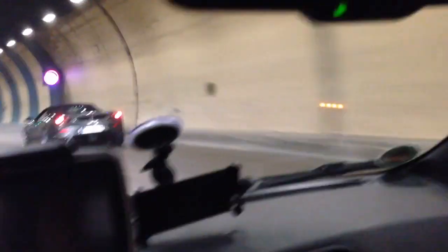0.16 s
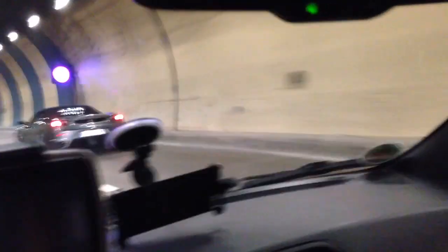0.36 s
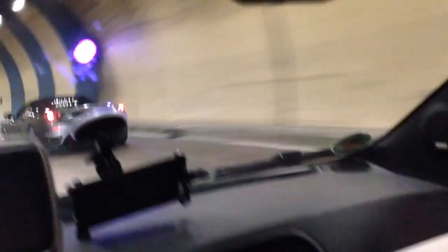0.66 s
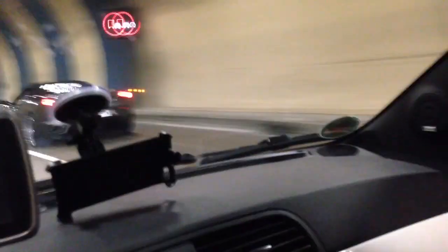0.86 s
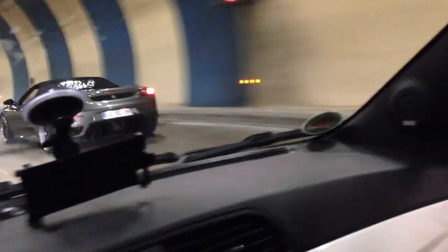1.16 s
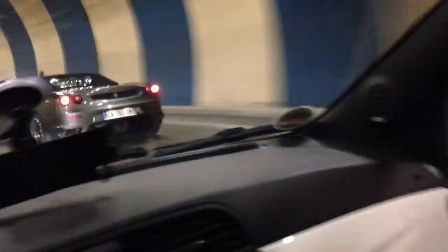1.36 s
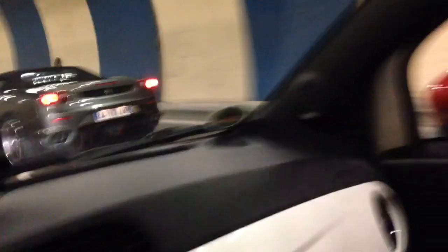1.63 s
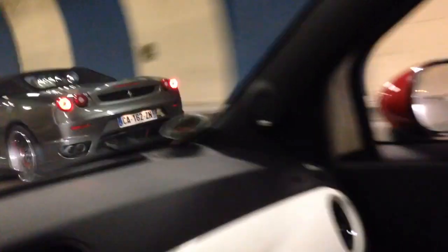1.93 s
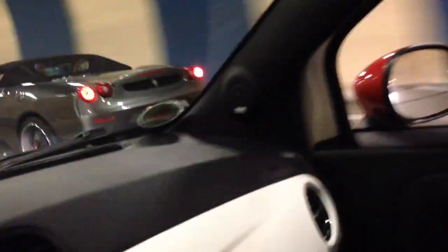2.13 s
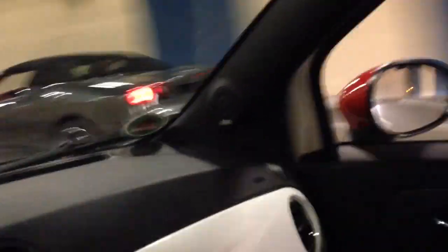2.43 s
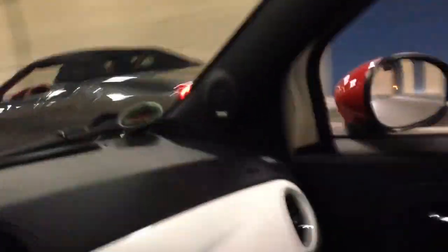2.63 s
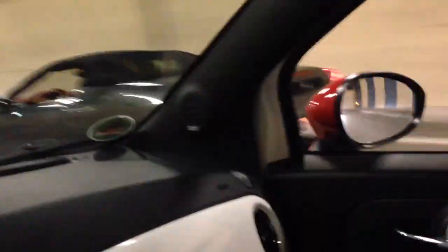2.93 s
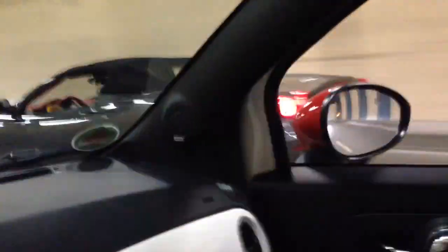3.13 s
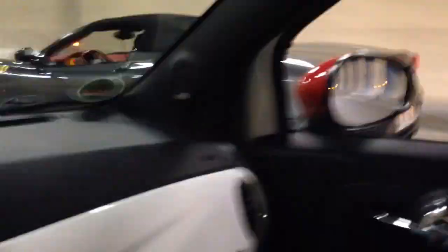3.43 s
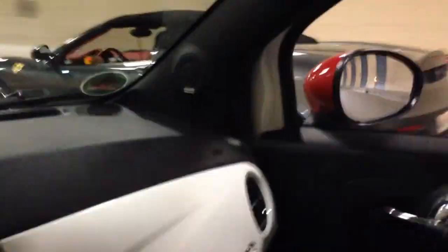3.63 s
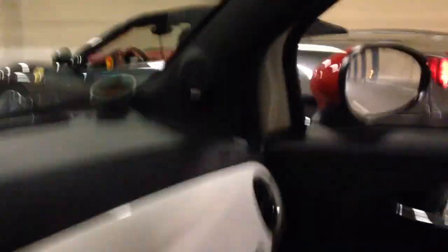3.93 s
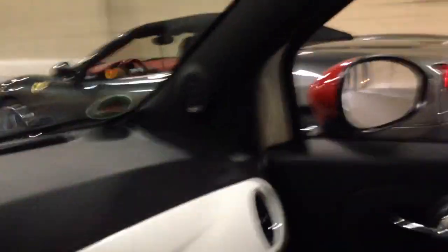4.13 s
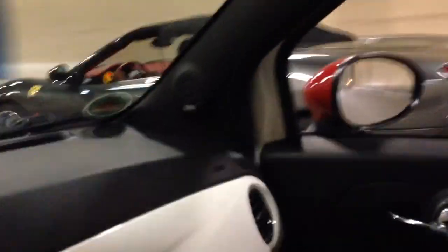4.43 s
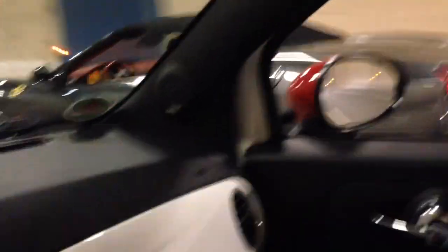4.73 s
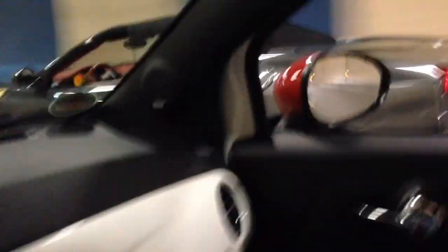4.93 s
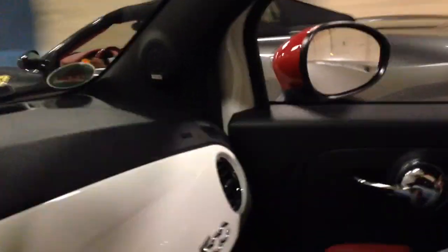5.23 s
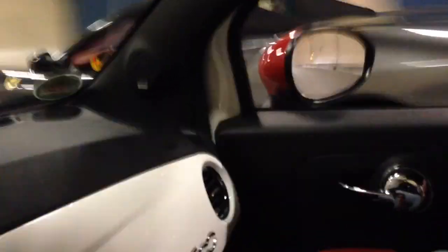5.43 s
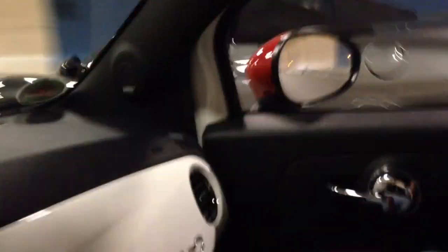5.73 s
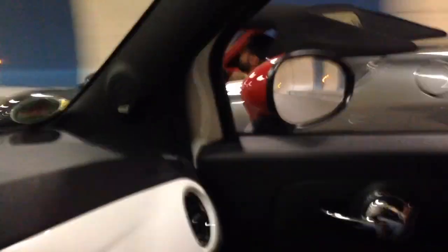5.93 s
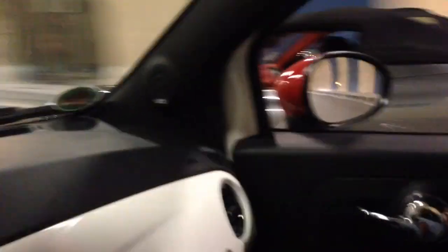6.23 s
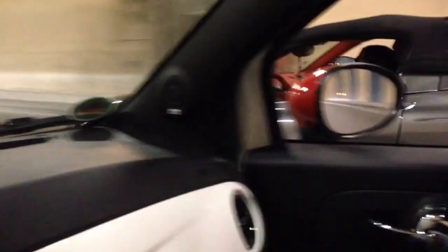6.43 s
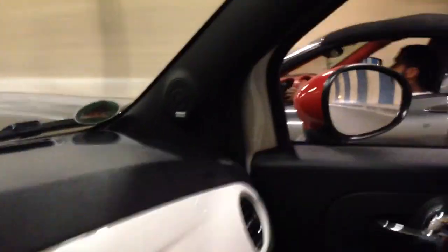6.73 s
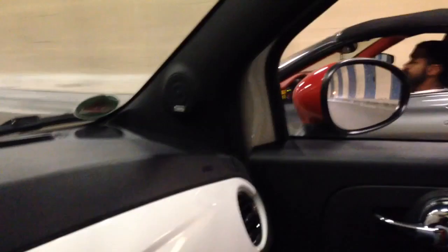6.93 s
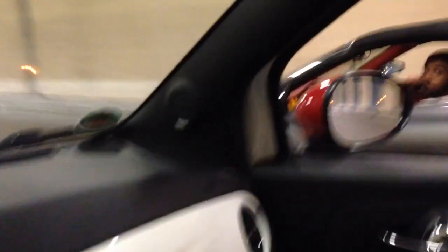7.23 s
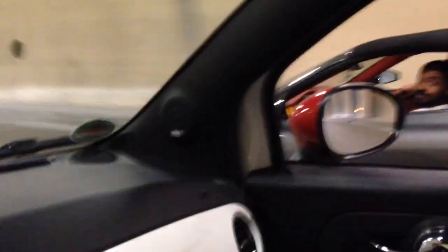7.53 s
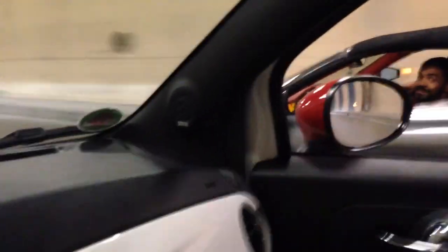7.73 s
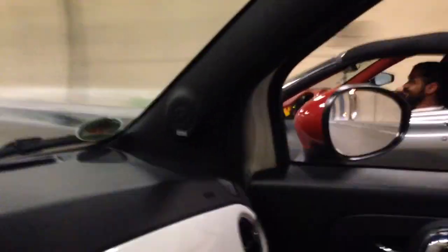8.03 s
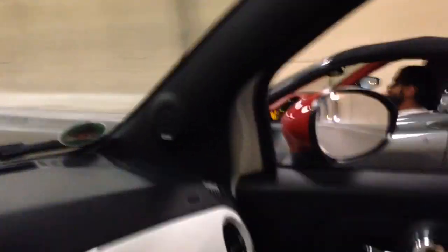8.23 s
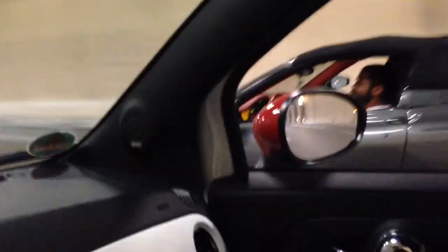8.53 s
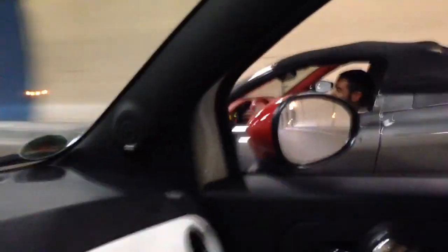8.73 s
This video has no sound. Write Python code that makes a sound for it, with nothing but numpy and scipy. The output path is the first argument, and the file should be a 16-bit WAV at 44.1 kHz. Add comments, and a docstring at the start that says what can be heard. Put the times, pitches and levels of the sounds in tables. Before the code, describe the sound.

From the first instant a powerful car's exhaust drones in a tunnel, heard inside a smaller moving car. The dominant tone is a low hum near 197 hertz, with weaker buzzing overtones. Over 0-2.2 seconds it flutters in quick swells and brief dropouts from wall echoes. From about 2.2 it is steadier and dense, its pitch creeping up to roughly 206 hertz around 4.5 as the cars run side by side; airy tyre and gas hiss is brightest here, with barely audible thin whistles around 3.6-6. The pitch then sinks gradually to about 193 by 8, dipping briefly near 7.1 and 7.4. Around 8.1-8.3 there is a short surge and small upward jump, then the drone weakens and breaks up. Tyre roar, floor rumble and the listener's low engine hum continue beneath, swelling as it ends at 8.9.

```python
"""A sports car's exhaust drones alongside in a road tunnel, heard from a small car with the window open.
Its tones are multiples of the bank firing rate; random wall echoes blur them and fade each on its own.
Its hiss is shaped noise puffing with the firings, joined by faint whistles of narrow-band noise.
Under it: our own engine's blurred hum, and shaped noise for tyre roar and floor rumble."""
import sys
import numpy as np
from scipy import signal
from scipy.fft import rfft, irfft
from scipy.io import wavfile
from scipy.ndimage import uniform_filter1d

SR = 44100
rng = np.random.default_rng(int(sys.argv[2]) if len(sys.argv) > 2 else 0)


def wav_record(signal):
    """Record a signal, one row per channel, as 16-bit PCM in the file named by sys.argv[1]."""
    frames = np.transpose(np.atleast_2d(signal))
    bounded = np.clip(frames, -1, 1)
    # unit amplitude maps onto the largest positive 16-bit level
    quanta = np.round(bounded * 32767).astype(np.int16)
    wavfile.write(sys.argv[1], SR, quanta)


N = 390726

# Road rumble through the floor. Each row: time in seconds, level in dB.
RUMBLE_LEVEL = [(0, -32), (.8, -28.5), (1.4, -22.5), (3.2, -37), (4, -26.5), (4.9, -29), (6.2, -25.5),
                (8, -24.5), (8.86, -26)]
# Rumble spectrum. Each row: frequency in Hz, relative density in dB.
RUMBLE_SPECTRUM = [(20, -6.5), (40, 15.5), (60, 21), (80, 18), (115, 22.5), (135, 22.5), (170, -30)]
# Broadband levels. Each row: time in seconds, tunnel tyre roar in dB, neighbour's hiss in dB.
NOISE_LEVELS = [(0.0, -34, -44), (0.02, -33, -45), (0.37, -31, -43.5), (0.67, -34, -46), (0.69, -33, -47.5),
                (1.18, -30, -43.5), (1.28, -34, -47), (1.8, -30, -41), (2.34, -31.5, -41),
                (2.39, -34.5, -44), (2.98, -30.5, -37.5), (3.75, -32, -39.5), (4.05, -31.5, -37),
                (4.39, -34.5, -39.5), (4.83, -33, -39), (5.77, -32.5, -43.5), (6.22, -33, -45),
                (6.44, -33.5, -49), (6.46, -35.5, -44.5), (7.23, -34, -43.5), (7.48, -31, -40),
                (7.72, -30, -49), (8.12, -29.5, -49), (8.19, -36, -46), (8.36, -35, -56),
                (8.69, -33.5, -52.5), (8.79, -28, -39.5), (8.86, -23.5, -40)]
# Roar spectrum. Each row: frequency in Hz, relative density in dB.
ROAR_SPECTRUM = [(120, -9), (180, 3), (260, -9.5), (500, -8.5), (850, -16), (1600, -19), (2400, -24),
                 (3200, -33.5), (5000, -38.5), (9000, -62), (15000, -94.5)]
# Our own engine. Each row: time in seconds, firing rate in Hz, level in dB, blurred share 0-1.
OWN_ENGINE = [(0, 155, -27, .6), (.8, 153, -24, 0.7), (1.1, 154, -19, 0.45), (2.3, 153, -25, 0.57),
              (3.1, 152.9, -19, 0.66), (4.5, 152.6, -26, 0.26), (5.4, 151.5, -20.5, 0.58),
              (6.3, 152.1, -26, 0.55), (7.2, 149.5, -22, 1), (7.7, 151.4, -16, 0.84),
              (8.15, 149.2, -22, 0.59), (8.36, 162, -18.5, 0.6), (8.69, 160.4, -14, 0.46),
              (8.86, 150.6, -9, .3)]
# Our own engine's tones. Each row: multiple of the firing rate, dB relative to the engine level.
OWN_MULTIPLES = [(.5, -24), (1, 1), (1.5, -15.5), (2, -22), (3, -25)]
# Whistles. Each row: start in seconds, end in seconds, start in Hz, end in Hz, width in Hz, peak level in dB.
WHISTLE_BANDS = [(5.15, 6.05, 4320, 4310, 90, -45), (3.7, 4.5, 6100, 6000, 300, -49),
                 (4.3, 5.1, 6900, 6900, 150, -51), (3.6, 5.1, 8250, 8150, 300, -52),
                 (8.665, 8.712, 12000, 11200, 160, -44)]
# Neighbour's hiss spectrum. Each row: frequency in Hz, relative density in dB.
HISS_SPECTRUM = [(1500, -26.5), (3000, 6), (4300, 9.5), (5200, 4.5), (7000, 5.5), (8500, -1),
                 (10500, -20.5), (12500, -31.5), (15500, -56)]
# Spectrum of the hiss's top octave. Each row: frequency in Hz, relative density in dB.
TOP_SPECTRUM = [(7000, -7), (9000, -0.5), (10200, -1), (11500, -6), (13500, -7), (15500, -10)]
# Neighbour's engine. Each row: time in seconds, firing rate of one bank in Hz, common overtone offset in dB.
BANK_ENGINE = [(0, 98.5, 0), (.6, 98.5, -1.5), (1.15, 99.4, -0.5), (1.42, 98.35, -4), (1.65, 98.8, -1),
               (2.15, 98.67, 3), (2.4, 99.4, -1), (2.65, 100.1, -0.5), (3.1, 100.6, -1.5),
               (3.6, 101.7, -0.5), (4.1, 102.3, 0.5), (4.3, 103.1, -3), (4.6, 103.2, 0.5),
               (5.2, 102.1, 0.5), (5.6, 100.6, 2), (5.9, 99.7, -2.5), (6.5, 98.12, -1), (7.2, 96.9, -1),
               (8.07, 96.4, 3.5), (8.19, 100.9, 0.5), (8.34, 100.1, -7), (8.7, 96.8, -3.5),
               (8.86, 97.1, -6)]
# Wall-echo scatter, scaled further for each tone. Each row: time in seconds, scatter 0-1.
WALL_SCATTER = [(0, 0.7), (2.1, 0.48), (2.6, 0.32), (5, 0.37), (5.6, 0.66), (6.4, 0.27), (7.2, 0.21),
                (8.2, 0.74), (8.86, 0.72)]
# Main drone, both banks, swelling and cancelling with its echoes. Each row: time in seconds, level in dB.
DRONE_LEVEL = [(0.0, -8.5), (0.24, -9), (0.29, -11.5), (0.39, -3), (0.44, -11.5), (0.49, -6), (0.86, -11),
               (0.91, -25), (1.01, -9.5), (1.23, -9), (1.31, -15.5), (1.43, -7.5), (1.5, -28), (1.65, -6.5),
               (1.73, -8.5), (1.78, -29), (1.92, -7.5), (1.95, -22), (2.0, -5), (2.07, -27), (2.17, -6.5),
               (3.72, -9.5), (4.19, -8), (5.48, -8.5), (6.46, -5.5), (6.56, -8.5), (7.06, -9.5),
               (7.13, -19), (7.4, -6.5), (7.43, -15.5), (7.9, -20), (7.97, -9.5), (8.04, -30), (8.09, -10),
               (8.19, -2.5), (8.29, -21.5), (8.31, -11.5), (8.56, -32), (8.59, -19.5), (8.86, -14)]
# Times in seconds at which the pipes face us from far behind, behind, rear quarter, rear wheel, door,
# door mirror, driver, windscreen, bonnet, ahead.
FACING_TIMES_S = [.2, 1, 2, 2.9, 4, 4.9, 5.75, 6.7, 7.7, 8.5]
# Exhaust overtones. Each row: multiple of the bank rate, then dB at each facing, before the common offset.
PIPE_OVERTONES = [(1, -30, -33.5, -21, -25.5, -29.5, -30, -26.5, -24.5, -28.5, -31),
                  (3, -25.5, -22.5, -21, -13, -20.5, -17.5, -23, -16.5, -28.5, -24),
                  (4, -23, -25.5, -28.5, -29.5, -26, -31.5, -27, -37.5, -31.5, -33),
                  (5, -30, -29, -26.5, -31.5, -24, -37, -25, -20, -23.5, -23),
                  (6, -29, -31, -26.5, -37, -22.5, -26, -32, -55, -42, -43),
                  (7, -28.5, -30.5, -28, -31, -35, -33.5, -35.5, -39, -39, -37),
                  (8, -30, -39, -30, -39.5, -30, -36, -39, -46.5, -49, -40),
                  (10, -48, -39, -37, -52, -36.5, -45, -51, -50, -50, -53)]
# Weak exhaust tones. Each row: multiple of the bank rate, dB with the pipes in view, dB after we pull ahead.
WEAK_TONES = [(2.5, -35.5, -27), (4.5, -55, -39)]


def gain_of(db):
    """Decibels to amplitude."""
    return 10 ** (np.asarray(db) / 20)


def evened(x):
    """Scales to rms 1."""
    return x / np.sqrt(np.mean(abs(x) ** 2) + 1e-20)


def curves(rows):
    """Each column of a time table, one value per sample."""
    time_s, *columns = np.transpose(rows)
    return [np.interp(np.arange(N) / SR, time_s, column) for column in columns]


def wobble(width_hz):
    """Complex noise of rms 1, half amplitude at +-width/2; drawn every 100 samples, interpolated."""
    hz = np.fft.fftfreq(N // 100 + 2, 100 / SR)
    re, im = rng.standard_normal((2, len(hz)))
    slow = evened(np.fft.ifft((re + 1j * im) / (1 + (2 * hz / width_hz) ** 2)))
    at, points = np.arange(N) / 100, np.arange(len(hz))
    return np.interp(at, points, slow.real) + 1j * np.interp(at, points, slow.imag)


def echo_paths(share, width_hz):
    """A steady direct path plus random echoes; power shares sum to 1."""
    share = np.clip(share, 0, 1)
    return np.sqrt(1 - share ** 2) + share * wobble(width_hz)


def drift(share, width_hz):
    """Random fading: the magnitude of summed direct and echo paths."""
    return abs(echo_paths(share, width_hz))


def tone(turns, db, scatter, width_hz):
    """A direct sine plus scattered echoes, which blur its strength and phase."""
    carrier = np.exp(2j * np.pi * (turns + rng.random()))
    return np.sqrt(2) * gain_of(db) * (echo_paths(scatter, width_hz) * carrier).real


def noise(spectrum, lo_hz, hi_hz, patchy_db, streaky_db, flicker_db):
    """Random short-time spectra with wide patches and narrow lasting streaks; rms 1 between lo and hi."""
    frames, hz = N // 256 + 5, np.fft.rfftfreq(N, 1 / SR)
    re, im, patches, streaks = rng.standard_normal((frames, 513, 4)).T
    # axis 0: frequency bins, axis 1: frames
    patches = uniform_filter1d(uniform_filter1d(patches, size=14, axis=0), size=16, axis=1)
    streaks = uniform_filter1d(uniform_filter1d(streaks, size=3, axis=0), size=70, axis=1)
    flicker = uniform_filter1d(rng.standard_normal(frames), size=8)
    field_db = patchy_db * evened(patches) + streaky_db * evened(streaks) + flicker_db * evened(flicker)
    cells = (re + 1j * im) * gain_of(field_db)
    flat = signal.istft(cells, nperseg=1024, noverlap=768)[1][:N]
    shape_hz, shape_db = np.transpose(spectrum)
    shape = gain_of(np.interp(np.log(hz + 1), np.log(shape_hz), shape_db, left=-80))
    shaped = rfft(flat) * shape
    band = irfft(shaped * (hz > lo_hz) * (hz < hi_hz), N)
    return irfft(shaped, N) / np.std(band)


def floor_rumble():
    """Low shaped noise: road rumble through the floor."""
    texture = noise(RUMBLE_SPECTRUM, 25, 184.7, patchy_db=0.67, streaky_db=0.13, flicker_db=2.5)
    return gain_of(curves(RUMBLE_LEVEL)[0]) * texture


def tyre_roar():
    """Broad shaped noise: tyre roar in the tunnel."""
    texture = noise(ROAR_SPECTRUM, 1030, 3700, patchy_db=0.98, streaky_db=2.34, flicker_db=0.23)
    return gain_of(curves(NOISE_LEVELS)[0]) * texture


def own_engine():
    """A low hum: blurred multiples of the firing rate, fading together."""
    firing_hz, level_db, blur = curves(OWN_ENGINE)
    turns = np.cumsum(firing_hz) / SR
    hum = sum(tone(k * turns, level_db + db, blur, width_hz=24.0) for k, db in OWN_MULTIPLES)
    return drift(0.78 * blur, width_hz=3.8) * hum


def whistles():
    """Narrow noise bands on gliding centres that swell and fade."""
    t, out = np.arange(N) / SR, np.zeros(N)
    for start_s, end_s, start_hz, end_hz, width_hz, db in WHISTLE_BANDS:
        swell = np.sin(np.pi * np.clip((t - start_s) / (end_s - start_s), 0, 1))
        turns = np.cumsum(np.interp(t, [start_s, end_s], [start_hz, end_hz])) / SR
        out += swell * tone(turns, db, 0.8, width_hz)
    return out


def neighbour_hiss(turns):
    """Tyre and gas hiss as shaped noise, puffing at the one-bank and both-bank firing rates."""
    mid_hiss_db, top_at_mid_db, top_slope_db_per_db = -42, -57, 1.1
    near_s, near_width_s, near_db = 4.5, 1.1, 3.5  # top octave gains while the tyres are nearest
    t, hiss_db = np.arange(N) / SR, curves(NOISE_LEVELS)[1]
    puffs = evened(1 + 0.056 * np.cos(2 * np.pi * turns) + 0.08 * np.cos(4 * np.pi * turns))
    hiss = noise(HISS_SPECTRUM, 4310, 9000, patchy_db=1.0, streaky_db=2.9, flicker_db=0.58)
    top = noise(TOP_SPECTRUM, 12160, 15000, patchy_db=0.7, streaky_db=1.6, flicker_db=0.3)
    top_db = top_at_mid_db + top_slope_db_per_db * (hiss_db - mid_hiss_db)
    top_db += near_db * np.exp(-((t - near_s) / near_width_s) ** 2)
    return puffs * (gain_of(hiss_db) * hiss + gain_of(top_db) * top)


def exhaust(turns, overtone_db):
    """Multiples of the bank firing rate, blurred and faded by wall echoes."""
    t, scatter = np.arange(N) / SR, curves(WALL_SCATTER)[0]
    # both banks together fire at twice the bank rate
    drone = tone(2 * turns, curves(DRONE_LEVEL)[0], 0.4 * scatter, width_hz=32)
    out = drift(0.2, width_hz=16) * drone
    for k, *facing_db in PIPE_OVERTONES:
        level_db = overtone_db + np.interp(t, FACING_TIMES_S, facing_db)
        blur = (0.81 + 0.051 * (k - 3)) * scatter  # shorter waves scatter more
        out += drift(0.65 * scatter, width_hz=4.8) * tone(k * turns, level_db, blur, width_hz=21.6)
    level_with_driver_s, turn_away_s = 5.9, 0.29
    ahead = np.clip((t - level_with_driver_s) / turn_away_s, 0, 1)  # pipes point away once we pass
    for k, in_view_db, ahead_db in WEAK_TONES:
        level_db = in_view_db + ahead * (ahead_db - in_view_db)
        out += tone(k * turns, level_db, 0.89, width_hz=5.1)
    return out


def neighbour():
    """Exhaust tones and hiss puffs locked to one crank speed."""
    bank_hz, overtone_db = curves(BANK_ENGINE)
    turns = np.cumsum(bank_hz) / SR  # bank firings so far
    return exhaust(turns, overtone_db) + neighbour_hiss(turns)


def scene():
    """All sources summed at one microphone."""
    return (floor_rumble() + tyre_roar() + own_engine() + whistles() + neighbour())[None]


def record(dry):
    """Soft limiting of the loudest crests to full scale, then a steep low-pass."""
    edge_hz = 15330
    limited = dry / (1 + abs(dry) ** 10) ** (1 / 10)
    low_pass = signal.firwin(1023, edge_hz, window=("kaiser", 9), fs=SR)
    return signal.oaconvolve(limited, low_pass[None], "same")


dry = scene()
out = record(dry)
wav_record(out)
```